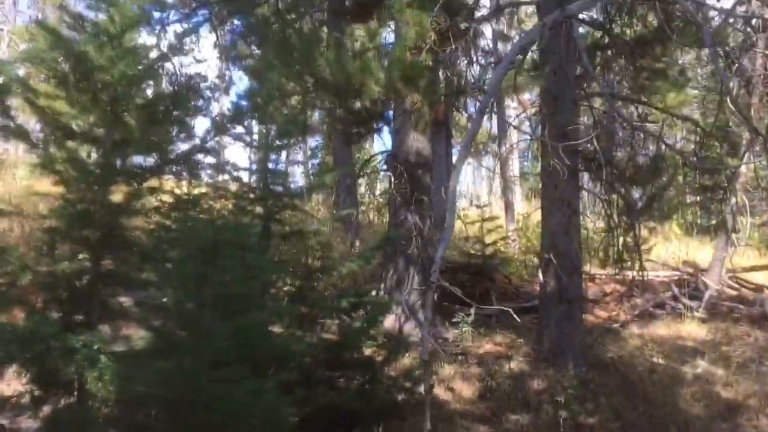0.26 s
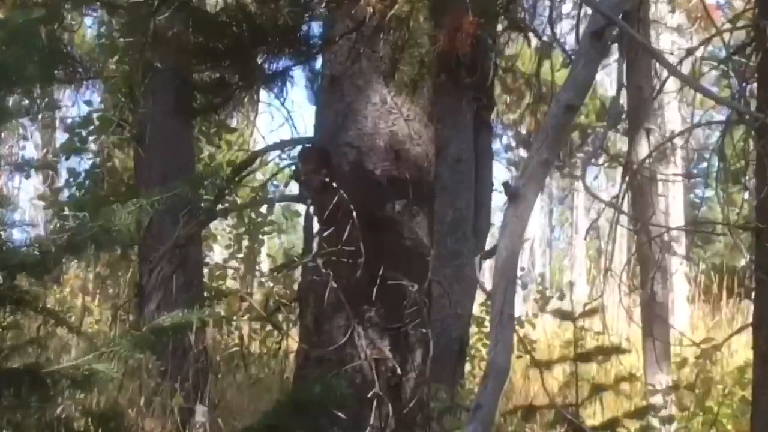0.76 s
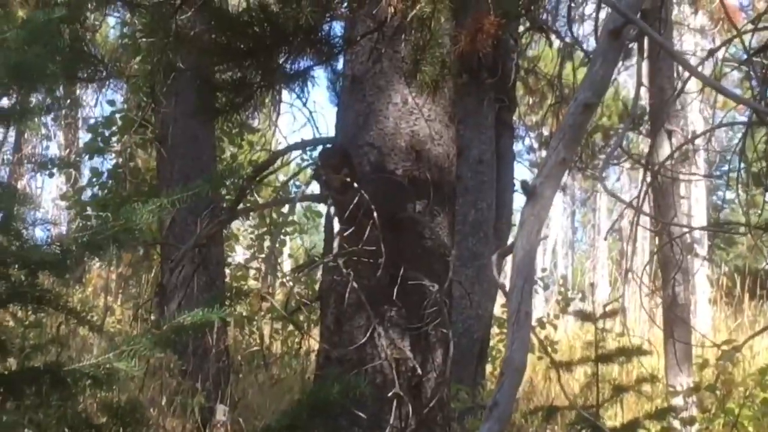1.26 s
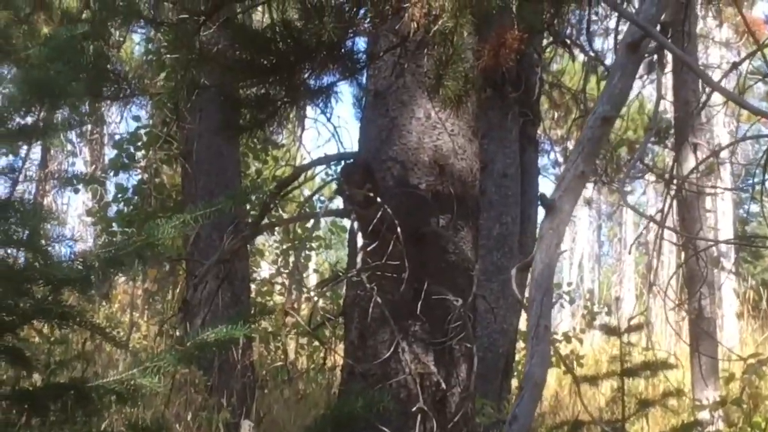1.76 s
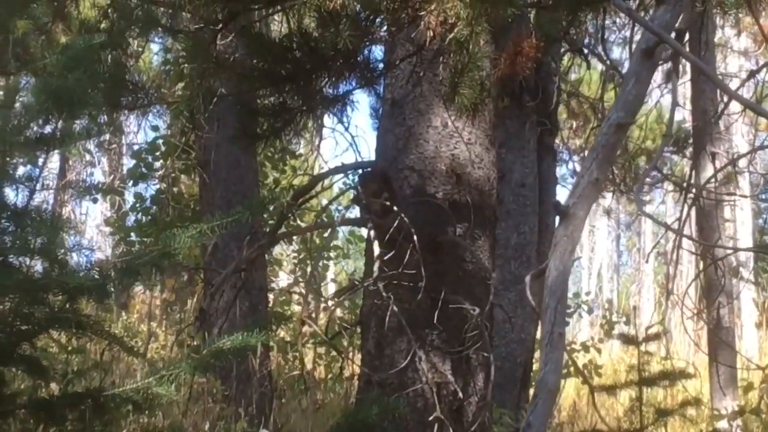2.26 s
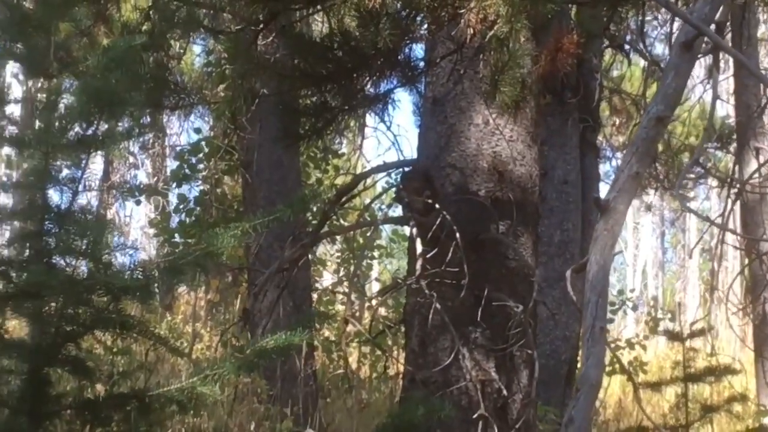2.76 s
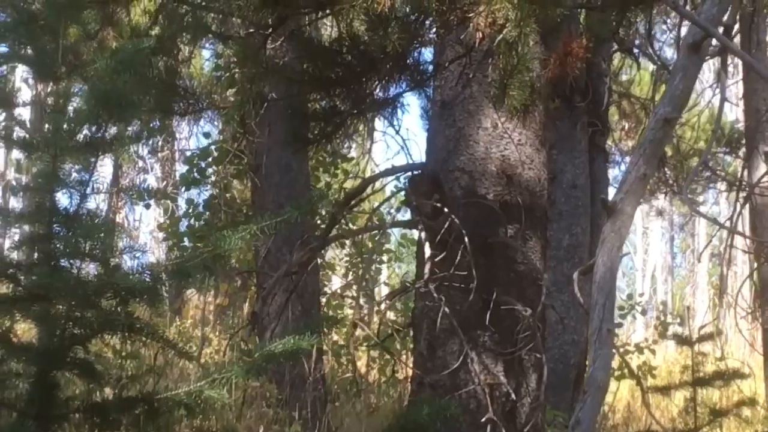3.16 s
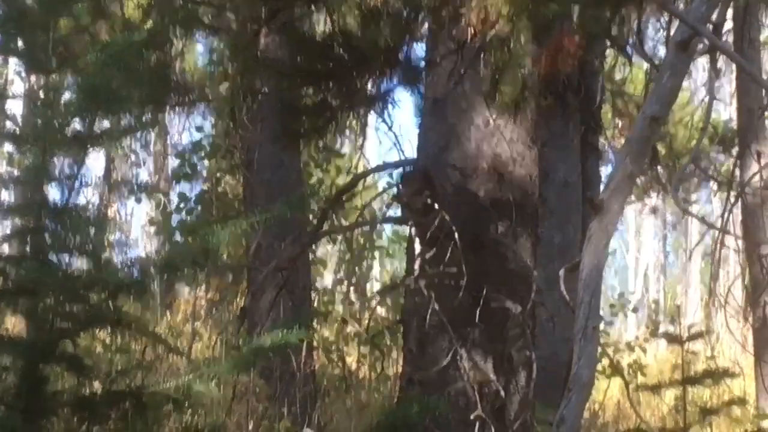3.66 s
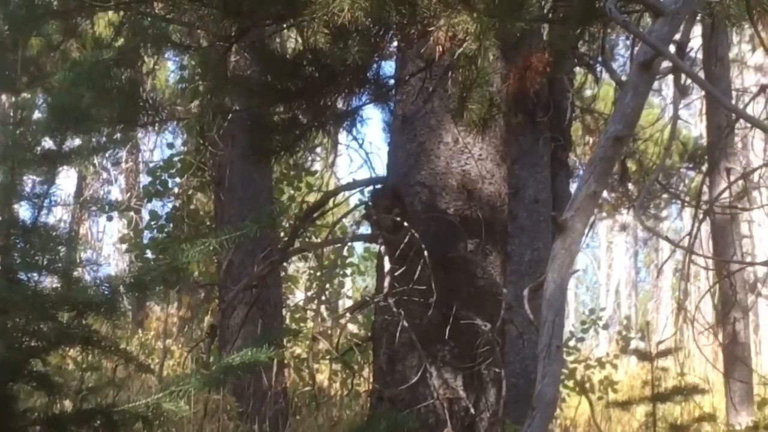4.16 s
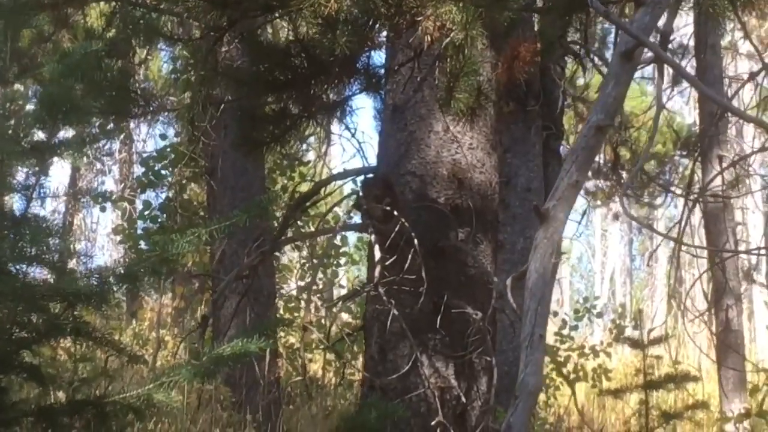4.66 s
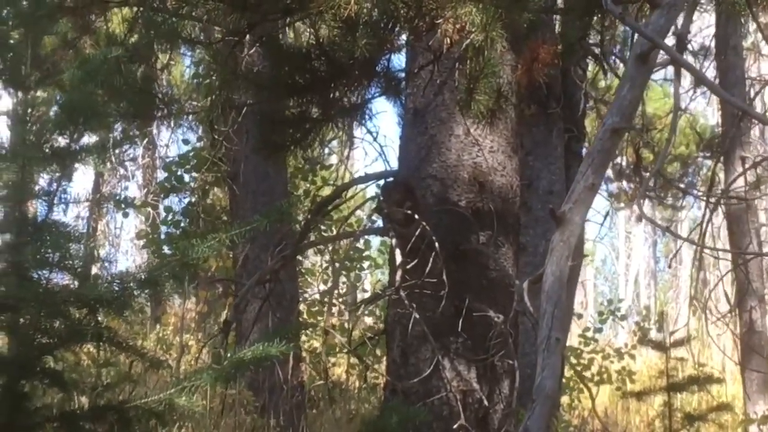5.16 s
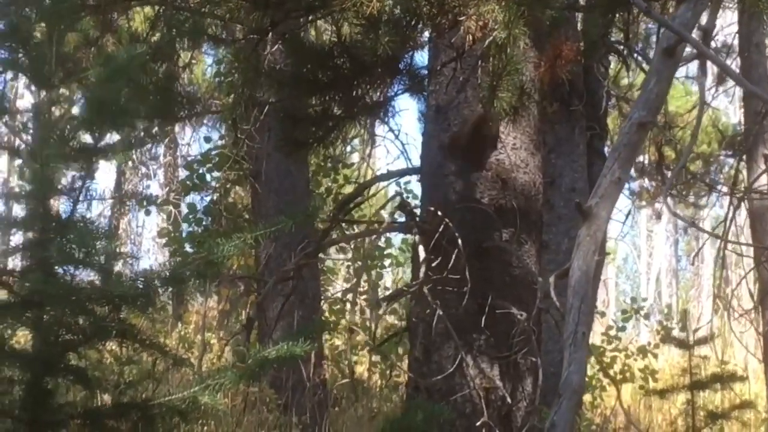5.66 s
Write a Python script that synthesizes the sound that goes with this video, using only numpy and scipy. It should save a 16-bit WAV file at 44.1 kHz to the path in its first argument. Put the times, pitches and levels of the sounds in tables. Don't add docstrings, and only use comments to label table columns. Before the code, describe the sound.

A very quiet conifer forest through a hand-held camera microphone. Soft breeze hisses in needles, with low wind puffs throughout. The start has a low bump and tiny clicks; around 0.55-0.6 s a cluster of dull ticks and a brief sleeve rub. Short faint fly buzzes come from 0.7 s, then the fly swoops close at about 1.8-2.4 s, a thin buzz near 250 beats a second, wavering, and lingers dully until 3.1 s, with scattered bouts until 4.6 s. Handling taps continue, with a harder click at 3.75 s and a low bump at 3.9 s. It is nearly still around 5 s. At 5.37 s a bow catch clicks, the string slaps at 5.4 s, the arrow hisses, and at 5.46 s it cracks very loudly into a trunk. Wood and shaft ring briefly, the trees return a short diffuse echo, and tiny bark crumbs tick down to the end at about 6 s.

```python
import sys
import numpy as np
from scipy import signal
from scipy.fft import rfft, irfft
from scipy.io import wavfile
from scipy.ndimage import map_coordinates

SR = 44100
rng = np.random.default_rng(int(sys.argv[2]) if len(sys.argv) > 2 else 0)


def field_ratio(decibels):
    return 10 ** (np.asarray(decibels, dtype=float) / 20)


def dump_mix(stems):
    frames = np.atleast_2d(stems).T
    limited = np.clip(frames, -1, 1)
    pcm = np.round(limited * 32767).astype(np.int16)
    wavfile.write(sys.argv[1], SR, pcm)


N = 261191

# start_s, level_db, rise_s, t60_s,
# tilt_db_per_octave
SHOT_BURSTS = [(5.3725, -38, .0004, .035, 3.5), (5.374, -47, .003, .5, 2.5), (5.388, -36, .003, .06, -1),
               (5.3925, -28, .003, .025, 0), (5.3955, -21, .001, .028, 2.5), (5.4005, -24, .001, .05, 1),
               (5.409, -23, .001, .035, -1), (5.419, -33, .001, .1, -1), (5.428, -36, .004, .5, -1.5),
               (5.4365, -34, .0006, .025, 4.5), (5.4447, -30, .0003, .025, 4), (5.451, -35, .003, .2, 3),
               (5.4608, -14, .001, .017, 3.5), (5.4625, -25, .002, .19, 1.5), (5.4695, -19, .0007, .02, 1),
               (5.4835, -24, .0007, .018, 1), (5.493, -28, .002, .08, 2), (5.552, -38, .003, .06, -1),
               (5.572, -45, .002, .04, 2.5)]
# pitch_hz, level_db
CRACK_COLOUR = [(60, -39), (130, -9), (300, -23.5), (450, -5.5), (780, -11.5), (1600, -8.5), (2400, -13.5),
                (3800, -13.5), (5000, -15), (8800, -18), (10500, -23.5), (13000, -26.5), (15700, -32),
                (16500, -94)]
SLAP_S, HIT_S, BITE_S, WHIP_S = 5.3964, 5.4607, 5.4685, 5.487
# pitch_hz, level_db, t60_s
CATCH_MODES = [(710, -38, .03), (5700, -34, .02), (4800, -39, .015)]
ZING_MODES = [(4750, -14, .012), (5100, -11, .013), (5500, -13, .012), (6800, -20, .012), (4100, -22, .012),
              (3350, -16, .014)]
LIMB_MODES = [(290, -25, 0.05), (180, -35, 0.2), (525, -39, 0.1), (668, -19, 0.035), (640, -39, .3),
              (1120, -25, .04), (1245, -20, 0.04), (1900, -27, .02), (2610, -27, 0.03), (4060, -24, .03)]
HUM_MODES = [(368, -25.5, .2), (684, -36, .12)]
POINT_MODES = [(1627, 0, 0.024), (2110, -2.5, 0.028), (900, -18, .02), (3000, -18, .01), (4200, -22, .01)]
SHAFT_MODES = [(377, -43, .45), (578, -20, .13), (588, -37, .36), (958, -28, .27), (1145, -23, .1),
               (1163, -44, .35), (1534, -33, .17), (1620, -30, .11), (1880, -14, .085), (1960, -22, .05),
               (2363, -43, .3), (2530, -36, .18), (3850, -31, .18)]
TRUNK_MODES = [(172, -27, 0.045), (296, -20, 0.035), (560, -24, .03), (930, -14, .025), (1135, -12, 0.065),
               (1245, -9, 0.04), (2785, -7, 0.02), (3164, -5, 0.02), (3085, -26, .1), (3880, -4, 0.013),
               (5200, -17, .012), (6900, -13, .012), (8750, -8, 0.011), (9400, -11.5, 0.011),
               (12900, -19, 0.011)]
BITE_MODES = [(1230, -12, .04), (1600, -12, .022), (1875, -5, .03), (2250, -25, .02), (2950, -19, .03)]
WHIP_MODES = [(1150, -22, .045), (1500, -27, .05), (1905, -17, .105), (2500, -27, .05), (3100, -25, .045),
              (3870, -26, .05)]
# start_s, level_db, pitch_hz
BARK_CRUMBS = [(5.559, -55.5, 13000), (5.583, -64.5, 12500), (5.599, -54, 6000), (5.618, -65, 8500),
               (5.668, -72, 10000), (5.705, -72, 7500), (5.723, -62, 11000), (5.757, -55, 8500),
               (5.760, -60, 5500), (5.773, -54.5, 7500), (5.862, -66, 13000), (5.901, -59.5, 8570),
               (5.912, -68, 4500)]
# pitch_hz, level_db
ECHO_COLOUR = [(150, -30), (350, -16), (750, -24), (1300, -6.5), (2000, -2), (3000, -9), (5000, -17.5),
               (9000, -22), (11000, -29), (15300, -36), (16500, -80)]
# middle_s, peak_db, half_length_s
LATE_ECHO = [
    (5.675, -59, .085),
]

# time_s, wingbeat_hz, level_db, facing_db
FLY_PASSES = [
    [(1.775, 264.7, -79, 12), (1.797, 266.8, -73, 12), (1.83, 266.5, -71, 13.5), (1.853, 259, -67, 10.5),
     (1.861, 263, -73, 2), (1.872, 270.3, -62, 4), (1.9, 253, -69.5, -3), (1.935, 238, -87, -11.5)],
    [(1.97, 260.3, -71, 0), (1.996, 254.8, -71.5, 5.5), (2.054, 238, -77.5, 2.5), (2.078, 243.3, -76.5, 5)],
    [(2.08, 242.6, -76, -2.5), (2.092, 262, -71, -4), (2.118, 246.2, -70, 2.5), (2.152, 262.5, -71, -4),
     (2.222, 244.3, -75.5, -0.5), (2.278, 247.8, -76, -3), (2.3, 259.7, -76, 0), (2.335, 254.5, -79, -3),
     (2.38, 237, -80, 3.5)],
]
# time_s, wingbeat_hz, level_db, facing_db
FLY_LINGERS = [
    [(2.66, 249.2, -81, 5.5), (2.72, 246.7, -80.5, 3), (2.8, 235.6, -78, 4), (2.9, 245.1, -85, 10),
     (2.98, 232, -86, 9), (3.07, 222, -85, 10.5), (3.09, 226.9, -83, 9.5)],
    [(2.36, 246.9, -89.5, 3), (2.44, 250.9, -84, 10), (2.53, 243.4, -84.5, 12.5), (2.57, 249, -82, 9.5)],
    [(1.6, 252.7, -92, 9), (1.68, 253.2, -88, 9.5), (1.77, 255, -85, 9)],
]
# start_s, length_s, first_wingbeat_hz, last_wingbeat_hz, level_db
FLY_BOUTS = [(0.704, 0.097, 253.7, 255, -77), (0.831, 0.082, 253.1, 243.5, -78.5),
             (1.035, 0.084, 266.2, 264.7, -76.5), (1.306, 0.075, 257.7, 256, -78.5),
             (1.433, 0.089, 252, 242.5, -80.5), (2.433, 0.14, 250, 243.7, -81),
             (2.568, 0.082, 270, 255, -75), (3.074, 0.086, 264, 246.6, -83.5),
             (3.23, 0.067, 266.5, 262, -82), (3.365, 0.076, 258.4, 266, -83),
             (3.637, 0.073, 258, 258, -84.5), (3.755, 0.117, 258, 253, -75), (3.904, 0.048, 244, 247, -90),
             (4.025, 0.12, 259.6, 259.7, -81.5), (4.471, 0.09, 248.1, 265.1, -81.5)]
# share_of_length, extra_db
BOUT_SHAPE = [(0, 2.5), (.25, 0), (.75, 0), (1, 2.5)]
# pitch_hz, level_db
WING_COLOUR = [(250, -0.5), (500, 5), (750, -10), (1000, 3), (1280, 2.5), (1520, -6), (1800, 3),
               (2200, -4.5), (3400, -6), (4900, -16), (6200, -11), (7700, -28), (10500, -26), (12000, -19)]
# pitch_hz, level_db
WING_HISS_COLOUR = [(1500, -27), (3500, 8), (6200, 2.5), (8000, 2), (12000, -23)]

# start_s, peak_db, pitch_hz
DULL_TICKS = [(.0085, -44, 1290), (.031, -47, 1570), (.385, -48, 1780), (.547, -58.5, 1200),
              (.552, -52, 1290), (.558, -40.5, 930), (.5603, -40, 1400), (.5662, -39, 546),
              (.5672, -37, 1207), (.573, -42, 1950), (.5947, -34, 1720), (.7294, -40.5, 950),
              (1.0546, -39.5, 1135), (1.356, -45, 1130), (1.757, -44, 782), (1.757, -44.5, 1550),
              (1.769, -48.5, 600), (1.768, -44, 1300), (2.548, -44.5, 624), (2.548, -45, 1135),
              (2.848, -38, 805), (2.905, -47, 1010), (3.1906, -39, 1207), (3.2178, -44, 990),
              (3.3065, -47.5, 1160), (3.7416, -43.5, 1050), (4.421, -46.5, 2120), (4.5207, -44, 2540)]
# start_s, peak_db, pitch_hz
LOOSE_PINGS = [(.0015, -45.5, 5200), (.018, -43.5, 3180), (.4365, -44.5, 2793), (.5165, -48.5, 585),
               (.513, -50, 963), (.651, -53, 1920), (.7915, -49.5, 1118), (.596, -45, 1030),
               (2.8222, -45.5, 840), (2.8229, -43, 481), (2.992, -54, 3720), (3.03, -54, 2490),
               (4.372, -58, 2900), (4.393, -53, 2300)]
# start_s, peak_db, pitch_hz, t60_s
HARD_CLICK = [
    (3.7554, -27, 1150, .0022),
    (3.7553, -33, 2800, .002),
    (3.7553, -45, 4800, .002),
    (3.7585, -49, 3400, .003),
]
# start_s, peak_db, pitch_hz, t60_s
HAND_BUMPS = [(0.031, -23.5, 50.4, 0.109), (0.141, -42.5, 78, 0.386), (0.591, -43, 72, 0.11),
              (1.759, -39.5, 59.4, 0.097), (2.562, -38.5, 137, 0.059), (2.589, -40, 185, 0.0454),
              (2.649, -40.5, 125, 0.037), (2.849, -34.5, 215, 0.015), (2.862, -43, 208, 0.0244),
              (2.897, -40, 180, 0.013), (2.96, -55, 360, 0.059), (3.651, -39.5, 141, 0.0193),
              (3.88, -51.5, 351, 0.035), (3.909, -31, 66, 0.091)]
# start_s, peak_db, lower_part_db, t60_s
DRY_SNAPS = [(0, -58.5, -4.5, 0.123), (0.022, -53, -6, .05), (0.033, -58.5, -5.5, 0.033),
             (.55, -68, 11, .12), (0.567, -69, 19, 0.035), (1.171, -46.5, 4, 0.0043),
             (1.171, -64, 1.5, 0.044), (1.924, -47.5, -14.5, 0.0096), (2.622, -53.5, 1, 0.012),
             (3.417, -55.5, -1.5, 0.013), (3.7555, -62, -6, 0.0027), (4.0155, -51.5, -4, 0.016)]
# pitch_hz, level_db
SNAP_HIGH = [(2500, -21), (6000, -11.5), (8500, -11.0), (15700, -10.5), (16500, -60)]
SNAP_LOW = [(700, -16), (2000, -3), (5000, -18.0), (7500, -32)]
# middle_s, peak_db, half_length_s
SLEEVE_RUBS = [
    (.565, -53, 0.0273),
    (1.15, -67, 0.11),
    (3.38, -65.5, 0.19),
    (3.58, -67.5, 0.073),
]
# pitch_hz, level_db
CLOTH_COLOUR = [(120, -40), (270, 14.5), (450, -3), (1200, -5), (2500, -37.5), (4000, -52)]

# middle_s, peak_db, half_length_s
AIR_PUFFS = [(.045, -49, 0.038), (.16, -43, 0.049), (.26, -59, 0.076), (.56, -50, 0.205), (.85, -56, 0.055),
             (1.05, -50.5, 0.19), (1.24, -53.5, 0.094), (1.37, -51, 0.04), (1.55, -55, 0.16),
             (1.78, -53, 0.031), (1.98, -63.5, 0.16), (2.56, -52, 0.0273), (2.95, -61, 0.052),
             (3.16, -69.5, 0.022), (3.41, -56, 0.0774), (3.51, -52.5, 0.051), (3.63, -55.5, 0.082),
             (3.8, -50.5, 0.13), (3.92, -48.5, 0.157), (4.1, -52.5, 0.056), (4.26, -61, 0.086),
             (4.5, -59.5, 0.058), (4.98, -49.5, 0.134), (5.28, -57, 0.045), (5.42, -58, 0.098),
             (5.76, -56.5, 0.15)]
# pitch_hz, level_db
PUFF_COLOUR = [(15, -45), (25, -19), (40, 1.5), (60, 5.5), (85, -1), (120, -9), (180, -32.5), (300, -62)]
# pitch_hz, level_db
FAR_WIND_COLOUR = [(15, -34), (32, -0.5), (50, -3), (90, -12.5), (200, -62)]
# time_s, level_db
BREEZE_LEVEL = [(0.0, -61.5), (0.25, -59.5), (0.54, -58), (1.23, -63), (1.8, -61), (1.97, -60), (2.29, -63),
                (3.34, -63.5), (4.65, -64), (5.35, -63)]
# middle_s, peak_db, half_length_s
NEEDLE_STIRS = [
    (.31, -93, 0.1),
    (.92, -82, 0.24),
    (2.3, -79.5, 0.494),
    (2.85, -83, 0.217),
    (3.41, -100, 0.069),
    (4.28, -96, 0.3),
    (5.78, -69, 0.096),
]
# pitch_hz, level_db
AIR_COLOUR = [(60, -25), (130, -7.5), (400, -6), (900, -11.5), (2200, -16.5), (4300, -20.5), (5100, -24),
              (6200, -22), (7700, -26.5), (9000, -24), (10500, -29), (11800, -25), (15750, -33.5),
              (16300, -50)]
# pitch_hz, level_db
LEAF_EDGE = [(2100, 0), (2500, -3), (4500, -30)]
RUSTLE_EDGE = [(1400, -30), (2500, -3), (3000, 0), (9800, 0), (10400, -3), (12000, -30)]
FIZZ_EDGE = [(9000, -30), (10400, -3), (11000, 0)]


def unit(x):
    return x / np.sqrt(np.mean(x ** 2) + 1e-20)


def along(points, hz):
    f, v = np.transpose(points)
    return np.interp(np.log(hz + 1), np.log(f + 1), v)


def wobble(rate, size=N):
    knots = rng.standard_normal(int(size * rate / SR) + 4)
    return map_coordinates(knots, [np.arange(size) * rate / SR])


def noise(size, gain_db):
    hz = np.fft.rfftfreq(size, 1 / SR)
    return unit(irfft(rfft(rng.standard_normal(size)) * field_ratio(gain_db(hz)), size))


def add(track, s, sound):
    part = track[round(s * SR):][:len(sound)]
    part += sound[:len(part)]


def swells(rows, floor_db):
    t = np.arange(N) / SR
    bells = sum(field_ratio(db - 21 * ((t - s) / half) ** 2) for s, db, half in rows)
    return 20 * np.log10(field_ratio(floor_db) + bells)


def ring(modes, rise):
    t = np.arange(SR // 2) / SR
    tones = np.zeros(len(t))
    for k, (hz, db, t60) in enumerate(modes):
        tones += (-1) ** k * field_ratio(db - 60 * t / t60) * np.sin(2 * np.pi * hz * t)
    return tones * (1 - np.exp(-t / rise))


def shot_bursts():
    out, t = np.zeros(N), np.arange(SR // 2) / SR
    for s, db, rise, t60, tilt in SHOT_BURSTS:
        burst = noise(len(t), lambda f: along(CRACK_COLOUR, f) + tilt * np.log2((f + 50) / 2000))
        add(out, s, field_ratio(db - 60 * t / t60) * (1 - np.exp(-t / rise)) * burst)
    return out


def bow():
    out = np.zeros(N)
    add(out, SHOT_BURSTS[0][0], ring(CATCH_MODES, .001))
    add(out, SLAP_S, ring(ZING_MODES, .0015))
    add(out, SLAP_S + .0025, ring(LIMB_MODES, .0015))
    add(out, SLAP_S + .006, ring(HUM_MODES, .02))
    return out


def arrow_in_trunk():
    out = np.zeros(N)
    add(out, HIT_S, ring(POINT_MODES, .0015) + ring(SHAFT_MODES, .005))
    add(out, HIT_S + .0013, ring(TRUNK_MODES, .0012))
    add(out, BITE_S, ring(BITE_MODES, .002))
    add(out, WHIP_S, ring(WHIP_MODES, .006))
    return out


def bark_crumbs():
    out, t = np.zeros(N), np.arange(SR // 20) / SR
    for s, db, hz in BARK_CRUMBS:
        flick = noise(len(t), lambda f: -23 * np.abs(np.log2((f + 1) / hz)))
        add(out, s, field_ratio(db - 60 * t / .017) * flick)
    return out


def trees():
    t = np.maximum(np.arange(N) / SR - 5.47, 0)
    near = field_ratio(-30 - 60 * t / .29)
    far = field_ratio(-53 - 60 * t / 3)
    level = near + far + field_ratio(swells(LATE_ECHO, -120))
    lumps = field_ratio(1.8 * wobble(150) + .6 * wobble(20))
    fade_in = np.clip(t / 0.0137, 0, 1)
    return fade_in * level * lumps * noise(N, lambda hz: along(ECHO_COLOUR, hz))


def bout_path(s, length, first_hz, last_hz, db):
    facing_db = 3
    return [(s + u * length, first_hz + u * (last_hz - first_hz), db + extra_db, facing_db)
            for u, extra_db in BOUT_SHAPE]


def fly():
    out = np.zeros(N)
    k = np.arange(1, 57)[:, None]
    for rows in FLY_PASSES + [bout_path(*row) for row in FLY_BOUTS] + FLY_LINGERS:
        s, *cols = np.transpose(rows)
        at = np.arange(round(s[0] * SR), round(s[-1] * SR))
        hz, db, facing_db = (np.interp(at / SR, s, c) for c in cols)
        unsteady_hz = hz * (1 + .006 * wobble(160, SR // 2)[:len(at)])
        turn = 2 * np.pi * np.cumsum(unsteady_hz) / SR
        knots = rng.standard_normal((len(k), 8))
        waver = np.array([np.interp((at - at[0]) * 14 / SR, np.arange(8), row) for row in knots])
        slope_db = -1 - 0.24 * facing_db
        tone_db = db + along(WING_COLOUR, k * 255) + slope_db * np.log2(k / 4) + 2.3 * waver
        tone_db = tone_db + facing_db * (np.isin(k, (1, 3, 6)) + .5 * (k == 2))
        tones = np.sqrt(2) * (field_ratio(tone_db) * np.cos(k * turn + 3 * np.log(k))).sum(0)
        torn_air = noise(SR // 2, lambda f: along(WING_HISS_COLOUR, f))[:len(at)]
        hiss = field_ratio(db - 7) * (1 + np.cos(turn)) * torn_air
        out[at] += signal.windows.tukey(len(at), .08) * (tones + hiss)
    return out


def knocks():
    out, t = np.zeros(N), np.arange(SR // 8) / SR
    ticks = [(s, db, hz, 8.8 / hz) for s, db, hz in DULL_TICKS]
    pings = [(s, db, hz, 19.1 / hz) for s, db, hz in LOOSE_PINGS]
    for s, db, hz, t60 in ticks + pings + HARD_CLICK + HAND_BUMPS:
        cycles = hz * (t + 0.039 * t60 * (1 - np.exp(-5 * t / t60)))
        grit = noise(len(t), lambda f: -np.where(f > hz, 13, 7) * np.abs(np.log2((f + 1) / hz)))
        grit = 0.33 * grit * field_ratio(-60 * t / t60)
        level = field_ratio(db + 2.0 - 60 * t / t60) * (1 - np.exp(-3.5 * hz * t))
        add(out, s, level * (np.sin(2 * np.pi * cycles) + grit))
    return out


def snaps():
    out, t = np.zeros(N), np.arange(SR // 8) / SR
    for s, db, low_db, t60 in DRY_SNAPS:
        high = noise(len(t), lambda f: along(SNAP_HIGH, f))
        low = noise(len(t), lambda f: along(SNAP_LOW, f))
        add(out, s, field_ratio(db - 60 * t / t60) * (high + field_ratio(low_db) * low))
    return out


def sleeve():
    level_db = swells(SLEEVE_RUBS, -120) + 2.7 * wobble(90)
    return field_ratio(level_db) * noise(N, lambda hz: along(CLOTH_COLOUR, hz))


def wind_on_microphone():
    buffeting = unit(field_ratio(0.76 * wobble(2.526)) * noise(N, lambda hz: along(PUFF_COLOUR, hz)))
    steady = field_ratio(-66.5) * noise(N, lambda hz: along(FAR_WIND_COLOUR, hz))
    return field_ratio(swells(AIR_PUFFS, -67)) * buffeting + steady


def forest():
    s, db = np.transpose(BREEZE_LEVEL)
    breeze_db = np.interp(np.arange(N) / SR, s, db)
    mean_db = breeze_db.mean()
    swing_db = breeze_db - mean_db
    stir = field_ratio(swells(NEEDLE_STIRS, -120))
    rustle = field_ratio(mean_db - 10 + 0.82 * swing_db) + field_ratio(-1) * stir
    fizz = field_ratio(mean_db - 17.5 + 0.52 * swing_db) + stir
    shared = wobble(4.665)
    out = np.zeros(N)
    for level, edge, trim_db in ((field_ratio(breeze_db), LEAF_EDGE, -.6), (rustle, RUSTLE_EDGE, -1.4),
                                 (fizz, FIZZ_EDGE, -3.3)):
        layer = noise(N, lambda hz: along(AIR_COLOUR, hz) + along(edge, hz))
        out += level * field_ratio(trim_db + 1.43 * shared + 0.54 * wobble(6.8)) * layer
    return out


def scene():
    air = wind_on_microphone() + forest()
    near_camera = fly() + knocks() + snaps()
    shot = shot_bursts() + bow() + arrow_in_trunk() + bark_crumbs() + trees()
    return (shot + near_camera + sleeve() + air)[None]


def top_cut(x):
    return signal.sosfilt(signal.butter(12, 16640, fs=SR, output="sos"), x)


def record(dry):
    rounded = dry / (1 + np.abs(dry / .95) ** 8) ** (1 / 8)
    low_pass = signal.butter(12, 16300, fs=SR, output="sos")
    return top_cut(signal.sosfiltfilt(low_pass, rounded))


dry = scene()
out = record(dry)
dump_mix(out)
```